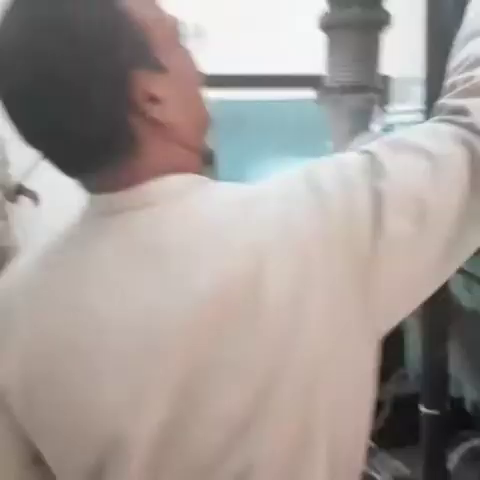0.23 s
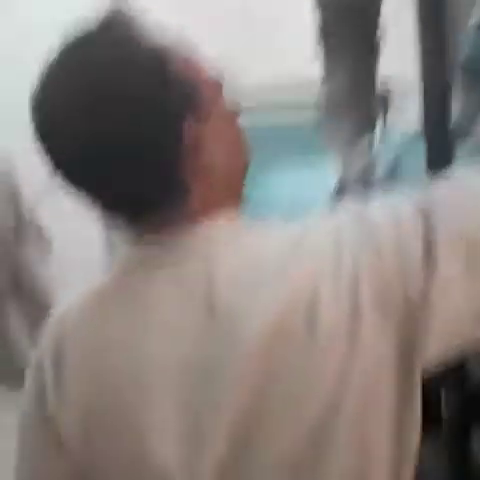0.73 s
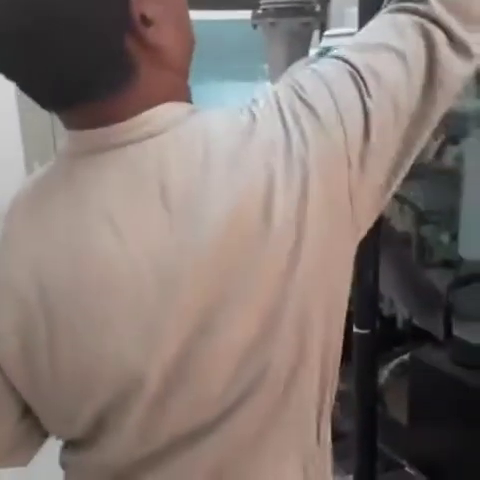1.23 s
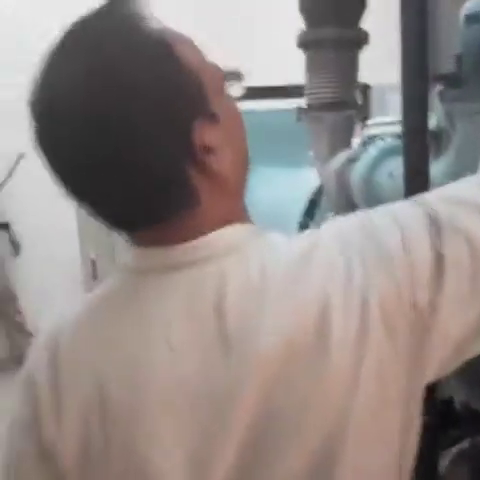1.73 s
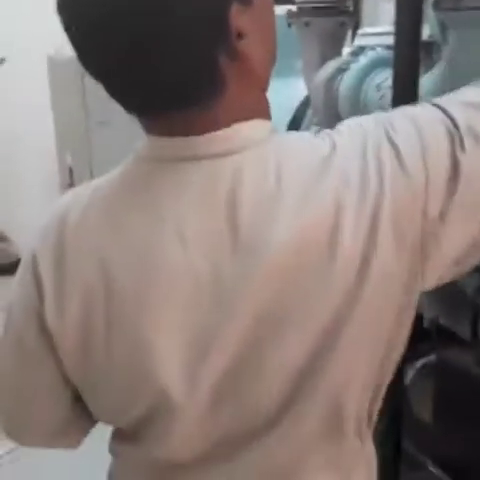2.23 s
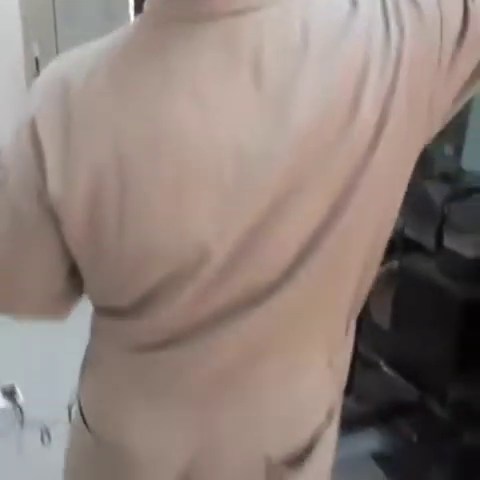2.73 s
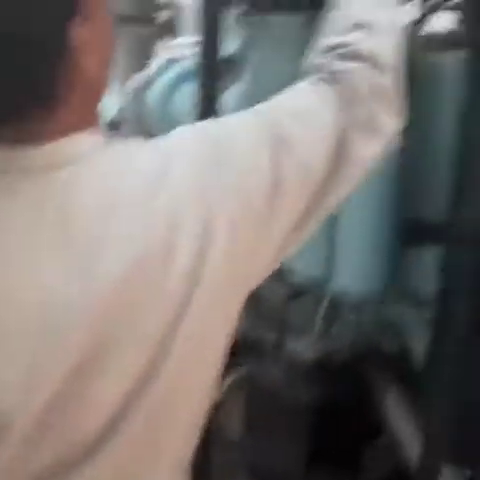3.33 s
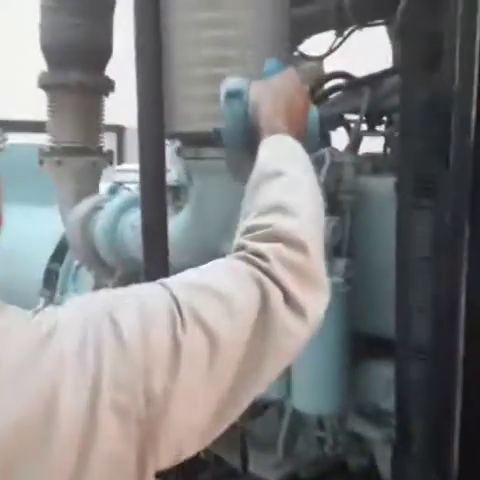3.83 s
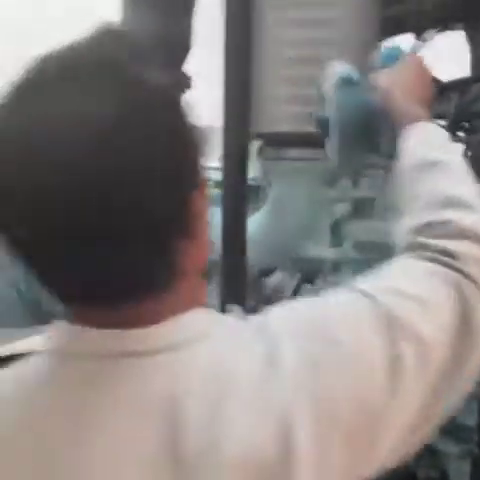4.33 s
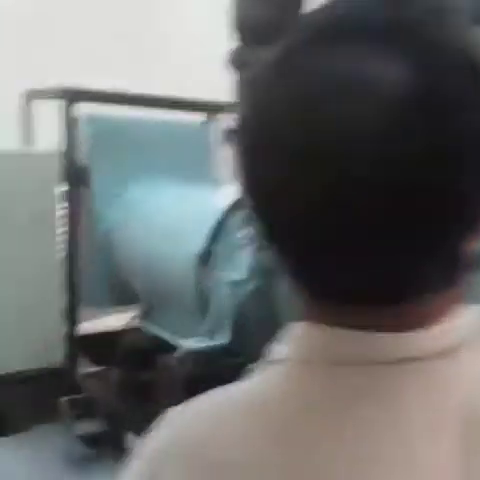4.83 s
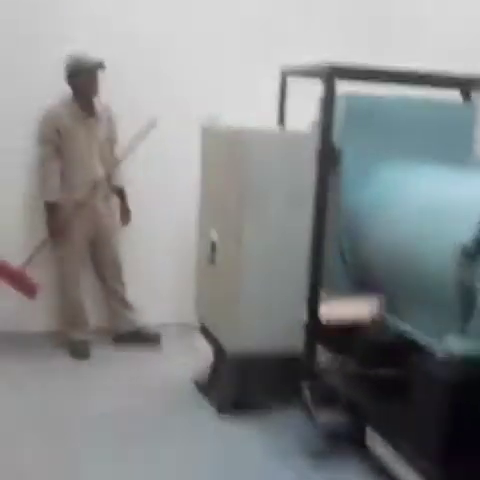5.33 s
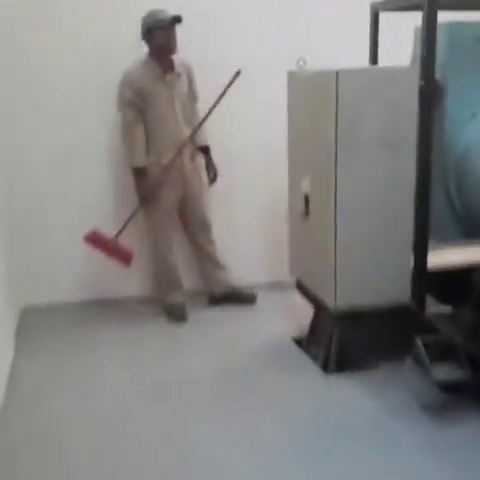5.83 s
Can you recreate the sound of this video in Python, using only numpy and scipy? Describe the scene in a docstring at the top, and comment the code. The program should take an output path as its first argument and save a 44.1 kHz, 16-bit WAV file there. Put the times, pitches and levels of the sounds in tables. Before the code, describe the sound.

From 0 to about 0.22 s, a dull, quieter machine roar fades slightly beneath a thin, unsteady whistle near 4.2 kHz. A silence of a few hundredths of a second follows. At 0.26 s a large diesel generator enters abruptly, close and loud, and runs at constant speed to the end, about 6 s. Dense irregular knocks blur into low rumble, boxy boom and metallic clatter, covered by bright, broad cooling-air hiss. Gear tones waver, and one piercing whine near 2.4 kHz flutters, swelling around 2.35 s and pulsing strongly from 3.7 to 5.2 s, with a fainter octave. Soft low gusts buffet the microphone at 1.2 s and repeatedly from 2.3 to 3.9 s. Hiss brightens around 4.9 s, then dulls slightly; low hum grows toward the end. The room is hard and reflective, the handheld microphone moving, the sound identical in both channels.

```python
"""A hard-walled room where a large diesel generator set runs at governed speed, heard by a moving microphone.
A duller, quieter spot with a thin whistle opens; after a short silence we stand close beside the engine.
Noise driven by random piston and valve knocks makes its roar and clatter, and gear harmonics sing with one
piercing whine. Low tones hum, cooling air hisses as shaped noise, narrow bands of noise swell for a moment,
and gusts of low-pitched noise buffet the microphone."""
import sys
import numpy as np
from scipy import signal
from scipy.fft import rfft, irfft, next_fast_len
from scipy.io import wavfile
from scipy.ndimage import map_coordinates

SR = 44100
rng = np.random.default_rng(int(sys.argv[2]) if len(sys.argv) > 2 else 0)


def to_wav(sig):
    """Store sig (one row per channel, or 1-D mono) as 16-bit WAV at the path in sys.argv[1].

    Samples outside -1..1 are clipped; the rate is SR.
    """
    pcm = np.clip(np.atleast_2d(sig), -1, 1) * 32767
    pcm = np.round(pcm).astype(np.int16)
    wavfile.write(sys.argv[1], SR, pcm.T)  # frames by channels


N = 267687
TIME = np.arange(N) / SR

# what reaches the moving microphone, before each layer's trim:
# (time [s], casing boom level [dB], air hiss level [dB])
EXPOSURE = [(0.3, -17.5, -21), (0.39, -19, -20), (1.63, -18, -19), (1.87, -22, -18.5), (1.88, -17, -19.5),
            (3.13, -20.5, -18.5), (3.21, -26, -17), (3.28, -18.5, -18.5), (3.66, -25, -19.5),
            (3.85, -19, -17), (3.97, -20.5, -20), (5.84, -23, -20), (5.86, -17, -20.5), (6.05, -27, -16)]


def undb(db):
    """Decibels to gain."""
    return 10 ** (np.asarray(db) / 20)


def unit(x):
    """Scale to rms 1."""
    return x / np.sqrt(np.mean(np.abs(x) ** 2))


def curve(table, axis=1):
    """One column of a table of (time, ..) rows, joined by straight lines."""
    rows = np.array(table)
    return np.interp(TIME, rows[:, 0], rows[:, axis])


def noise():
    """White noise."""
    return rng.standard_normal(N)


def colour(x, spectrum, modes=()):
    """Filter by a broad spectrum with resonances standing on it; rms 1."""
    size = next_fast_len(N)
    f = np.arange(size // 2 + 1) * SR / size
    hz, db = np.transpose(spectrum)
    gain_db = np.interp(np.log(f + 1), np.log(hz), db)  # the 1 Hz offset avoids log(0)
    for centre, width, lift in modes:
        gain_db = gain_db + lift / (1 + (2 * (f - centre) / width) ** 2)
    filtered = irfft(rfft(x, size) * undb(gain_db), size)
    return unit(filtered[:N])


def walk(rate):
    """Smooth random motion through `rate` new random points a second; rms 1."""
    steps = rng.standard_normal(4096)
    coarse = TIME[::32]
    motion = map_coordinates(steps, [coarse * rate + 2], order=3, mode="wrap")
    return unit(np.interp(TIME, coarse, motion))


def room_tone(phase, diffuse, rate):
    """A tone plus its reflections, whose sum drifts in strength and phase; `diffuse` is their power share."""
    share = np.clip(diffuse, 0, 1)
    echoes = walk(rate) * np.cos(phase) + walk(rate) * np.sin(phase)
    return np.sqrt(2 * (1 - share)) * np.sin(phase) + np.sqrt(share) * echoes


def knocks(rate, depth, ring_s):
    """Noise whose power jumps at random knocks and dies away over ring_s, above an even wash."""
    hits = (rng.random(N) < rate / SR) * undb(2 * rng.standard_normal(N))
    energy = signal.lfilter([1], [1, -np.exp(-1 / (ring_s * SR))], hits)
    return noise() * np.sqrt(1 + depth * energy / energy.mean())


def standing_waves(x, patchy_db, patch_hz, patch_s):
    """Narrow bands rise and sink as the microphone moves through the room's interference pattern."""
    f, t, frames = signal.stft(x, SR, nperseg=2048)
    field = rng.standard_normal((512, 128))
    position = np.meshgrid(f / patch_hz, t / patch_s, indexing="ij")
    pattern = unit(map_coordinates(field, position, order=3, mode="wrap"))
    shaded = signal.istft(frames * undb(patchy_db * pattern), SR)[1]
    return unit(shaded[:N])


def far_spot():
    """A duller, quieter machine roar from filtered noise, with a thin whistle and its faint octave."""
    # roar spectrum: (frequency [Hz], relative level [dB])
    roar_spectrum = [(18, -86), (30, -54), (82, -7), (129, -6), (224, -11), (303, -7), (399, -10),
                     (453, -13), (1800, -19), (3220, -29.5), (4240, -29), (4570, -33), (12200, -44)]
    # roar strength: (time [s], level [dB])
    roar_level = [(0, -27.5), (0.1, -30), (0.22, -32.5)]
    # whistle strength: (time [s], level [dB])
    whistle_level = [(0, -45), (0.05, -39), (0.09, -37), (0.14, -54), (0.175, -40), (0.195, -53),
                     (0.21, -48)]
    whistle_hz = 4171

    roar = undb(curve(roar_level)) * colour(noise(), roar_spectrum)
    phase = 2 * np.pi * whistle_hz * TIME
    whistle = room_tone(phase, diffuse=0.05, rate=41)
    octave = undb(-15) * room_tone(2 * phase, diffuse=0.5, rate=90)
    return roar + undb(curve(whistle_level)) * (whistle + octave)


def draught():
    """Air stirs at the microphone; each gust rises quickly, sags and dies away, and strong ones thud higher."""
    # gusts: (time of full strength [s], hold before release [s], level before trim [dB])
    gusts = [(1.18, 0.062, -31), (2.274, 0.172, -28), (2.437, 0.1, -30), (2.713, 0.03, -31),
             (2.839, 0.041, -35), (2.92, 0.14, -25.5), (3.076, 0.044, -32), (3.258, 0.055, -27),
             (3.521, 0.128, -24.5), (3.647, 0.06, -26), (3.758, 0.064, -30), (3.882, 0.035, -29.5)]
    # low buffeting: (frequency [Hz], relative level [dB])
    buffet_spectrum = [(25, -28), (50, -19), (85, -3.5), (125, -0.5), (165, -4), (260, -2.5), (420, -25),
                       (1200, -48)]
    # higher thud of strong gusts: (frequency [Hz], relative level [dB])
    body_spectrum = [(70, -30), (150, 0), (200, -4), (300, -6), (600, -37)]
    breeze_db, breeze_swing_db, breeze_per_s = -43.5, 3.5, 9  # stirring air between the gusts
    gust_trim_db, sag_db_per_s = 0.8, 13
    attack_s, release_s = 0.012, 0.02
    body_db, body_at_db = -4.5, -22  # thud relative to the buffeting, for a push of body_at_db

    push = undb(breeze_db + breeze_swing_db * walk(breeze_per_s))
    for start, length, db in gusts:
        age = np.maximum(TIME - start, 0)
        rise = np.clip((TIME - start) / attack_s + 1, 0, 1)
        fall = np.exp(-np.maximum(age - length, 0) / release_s)
        gust = undb(db + gust_trim_db - sag_db_per_s * age) * rise * fall
        push = np.maximum(push, gust)
    body = undb(body_db) * push / undb(body_at_db)
    return push * (colour(noise(), buffet_spectrum) + body * colour(noise(), body_spectrum))


def hum():
    """Steady low tones of the set waver in the room and grow toward the alternator end."""
    # tones: (frequency [Hz], level before nearness [dB])
    hum_tones = [(129, -44.5), (253, -40.5), (655, -37), (1003, -40)]
    # nearness of the alternator end: (time [s], gain [dB])
    nearness = [(0.26, -3.5), (2, -2.5), (4.6, -1.5), (5.3, -0.5), (6.07, 5.5)]
    tones = np.zeros(N)
    for hz, db in hum_tones:
        tones += undb(db) * room_tone(2 * np.pi * hz * TIME, diffuse=0.3, rate=6)
    return undb(curve(nearness)) * tones


def cooling_air():
    """Turbulent hiss of fan and intake with a fine rattle in it; its top follows the microphone's facing."""
    # hiss spectrum: (frequency [Hz], relative level [dB])
    air_spectrum = [(1200, -36), (2550, 1.5), (2900, -1), (3200, -3), (3750, -2), (4200, 2), (5400, 2),
                    (6600, 1.5), (7300, -1), (8050, -3), (9600, -2.5), (10600, -1.5), (12300, -5.5)]
    # duct resonances: (centre [Hz], width [Hz], lift [dB])
    air_modes = [(4820, 360, 4.9), (8530, 270, 4.1), (8940, 520, 5.7)]
    # treble as the microphone turns: (time [s], gain above the shading edge [dB])
    facing = [(0.26, -1.5), (0.8, 0), (2.4, -1.5), (3.5, -1), (3.75, -1.5), (3.96, -4), (4.02, 1.5),
              (4.5, 0), (4.9, 3), (5.12, 2.5), (5.17, -1), (5.35, -1), (5.55, 0.5), (6.07, -0.5)]
    shade_edge_hz = 6700
    trim_db, flicker_db = 1.72, 0.63

    hiss = colour(knocks(rate=410, depth=0.15, ring_s=0.0017), air_spectrum, air_modes)
    hiss = standing_waves(hiss, patchy_db=2.0, patch_hz=109.3, patch_s=0.14)
    highpass = signal.butter(4, shade_edge_hz, "high", fs=SR, output="sos")
    top = signal.sosfiltfilt(highpass, hiss)
    shaded = hiss + (undb(curve(facing)) - 1) * top
    return undb(curve(EXPOSURE, axis=2) + trim_db + flicker_db * walk(45)) * shaded


def swells():
    """Narrow bands of noise, near gear harmonics or in the clatter and treble, swell for a moment."""
    # swells: (peak time [s], half length [s], centre [Hz], width [Hz], level at peak [dB])
    band_swells = [(0.854, 0.31, 4150, 600, -27), (1.33, 0.066, 1640, 70, -21), (2.08, .094, 1017, 40, -25),
                   (2.8, 0.05, 1910, 180, -18.5), (3.526, .11, 1086, 22, -19),
                   (4.223, 0.17, 548, 100, -25.5), (5.326, 0.1, 867, 25, -24.5),
                   (6.027, 0.099, 2690, 500, -18.5)]
    out = np.zeros(N)
    for peak_s, half_s, hz, width, db in band_swells:
        edges = [hz - width / 2, hz + width / 2]
        band = signal.butter(2, edges, "band", fs=SR, output="sos")
        swell = np.exp(-0.5 * ((TIME - peak_s) / half_s) ** 2)
        out += undb(db) * swell * unit(signal.sosfilt(band, noise()))
    return out


def whine(phase):
    """One piercing harmonic fades in and out; quick flutter roughens it, and its octave twice as much."""
    # swelling as the microphone moves through standing waves: (time [s], level before trim [dB])
    tone_level = [(0.27, -24), (0.82, -21), (1.48, -28.5), (2.35, -19), (2.44, -24.5), (3.67, -20),
                  (3.7, -15), (3.78, -27), (4.07, -16), (4.13, -29), (4.25, -17), (4.37, -34),
                  (4.74, -16.5), (4.81, -25), (5.18, -18), (5.31, -26.5), (5.95, -20), (6.05, -22)]
    # the flickering octave: (time [s], level before trim [dB])
    octave_level = [(0.26, -27.5), (0.8, -26.5), (1.4, -25), (1.8, -36), (2.4, -26.5), (3.7, -30),
                    (5.5, -30), (6.07, -29)]
    trim_db, octave_trim_db = 1.5, 1.5
    fade_depth_db, fades_per_s, fade_scatter = 3, 5.5, 0.299

    flutter_hz = 3 * walk(25) + 4.57 * walk(130)
    phase = phase + 2 * np.pi * np.cumsum(flutter_hz) / SR
    fades = np.cumsum(fades_per_s * (1 + fade_scatter * walk(10))) / SR
    fading = unit(undb(fade_depth_db * np.sin(2 * np.pi * fades)))
    tone = undb(curve(tone_level) + trim_db) * fading * room_tone(phase, diffuse=0.033, rate=37)
    octave = undb(curve(octave_level) + octave_trim_db) * room_tone(2 * phase, diffuse=0.7, rate=35)
    return tone + octave


def gears():
    """Mesh harmonics on one shaft, each wavering among its own reflections."""
    # gear train speed: (time [s], mesh rate before jitter [Hz])
    mesh_rate = [(0.26, 269.7), (0.75, 270.5), (1.2, 271.3), (2.3, 271.6), (3.0, 271.5), (3.9, 271.9),
                 (5.1, 271.5), (6.07, 271.7)]
    # harmonics: (multiple of the mesh rate, level [dB])
    gear_orders = [(1, -37), (2, -32), (3, -30), (4, -34), (5, -31.5), (6, -31.5), (7, -36), (8, -33),
                   (10, -35), (12, -41), (13, -39.5), (15, -39), (16, -41), (19, -35), (21, -39.5),
                   (24, -40), (28, -45)]
    whine_order = 9

    mesh_hz = curve(mesh_rate) * (1 + 0.0004 * walk(14))
    phase = 2 * np.pi * np.cumsum(mesh_hz) / SR
    out = whine(whine_order * phase)
    for multiple, db in gear_orders:
        start = rng.uniform(0, 2 * np.pi)
        harmonic = room_tone(multiple * phase + start, diffuse=0.66, rate=7 + 0.4 * multiple)
        out = out + undb(db) * harmonic
    return out


def engine():
    """Knocks shake the block (rumble), a large casing (boom) and the covers (clatter)."""
    # block, casing and cover spectra: (frequency [Hz], relative level [dB])
    rumble_spectrum = [(30, -54), (60, -15.5), (120, -17), (200, -9), (280, 0), (420, 2), (560, 4),
                       (750, 4), (1100, -19), (3000, -50)]
    boom_spectrum = [(450, -35.5), (640, -10), (740, -2), (815, 5.5), (880, -1.5), (960, -4), (1300, -35)]
    clatter_spectrum = [(400, -42), (800, -6), (1050, -1), (1400, 1), (2100, -0.5), (2450, 2), (2530, -8.5),
                        (2620, -7.5), (2900, -6), (3400, -11.5), (4500, -34), (9000, -41)]
    # cover resonances: (centre [Hz], width [Hz], lift [dB])
    clatter_modes = [(1563, 82, 4), (2520, 470, 1.5), (2690, 130, 3)]
    # strength of the covers: (time [s], level before trim [dB])
    clatter_level = [(0.3, -18), (0.41, -19), (0.44, -15.5), (1.1, -18.5), (1.31, -14), (1.52, -17.5),
                     (1.63, -15), (1.92, -18), (2.03, -15.5), (2.73, -17.5), (2.78, -15.5), (2.97, -18),
                     (3.49, -16.5), (5.52, -16.5), (5.7, -13.5), (5.74, -18.5), (5.99, -17.5), (6.05, -17)]
    boom_trim_db, clatter_trim_db = -0.6, 1.18

    heavy = knocks(rate=160, depth=0.55, ring_s=0.0053)
    rumble = undb(-25.0 + 0.71 * walk(6)) * colour(heavy, rumble_spectrum)

    medium = knocks(rate=240, depth=0.53, ring_s=0.0056)
    boom = undb(curve(EXPOSURE, axis=1) + boom_trim_db) * colour(medium, boom_spectrum)

    sharp = knocks(rate=330, depth=0.99, ring_s=0.012)
    covers = colour(sharp, clatter_spectrum, clatter_modes)
    covers = standing_waves(covers, patchy_db=2.1, patch_hz=69.4, patch_s=0.16)
    clatter = undb(curve(clatter_level) + clatter_trim_db) * covers
    return rumble + boom + clatter


def scene():
    """The quiet spot, a short silence, then close beside the engine; one microphone feeds both channels."""
    quiet_end_s, close_start_s = 0.2245, 0.2578
    close = draught() + hum() + cooling_air() + swells() + gears() + engine()
    mono = far_spot() * (TIME < quiet_end_s) + close * (TIME >= close_start_s)
    return np.array([mono, mono])


def record(dry):
    """Round the highest peaks smoothly, then cut the top with a steep low-pass."""
    top_hz = 12380
    rounded = dry / (1 + np.abs(dry) ** 8) ** (1 / 8)
    lowpass = signal.ellip(14, 0.1, 90, top_hz, fs=SR, output="sos")  # 0.1 dB ripple, 90 dB rejection
    return signal.sosfilt(lowpass, rounded)


dry = scene()
out = record(dry)
to_wav(out)
```